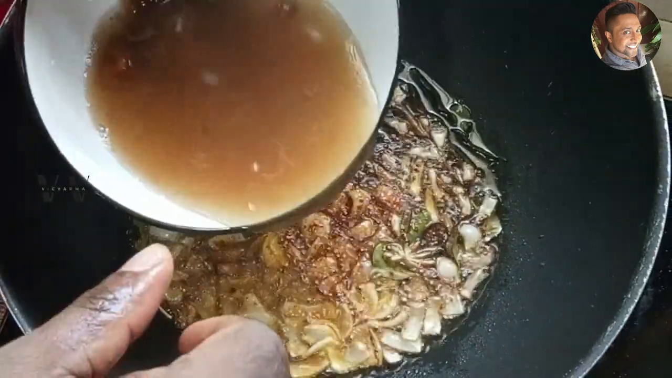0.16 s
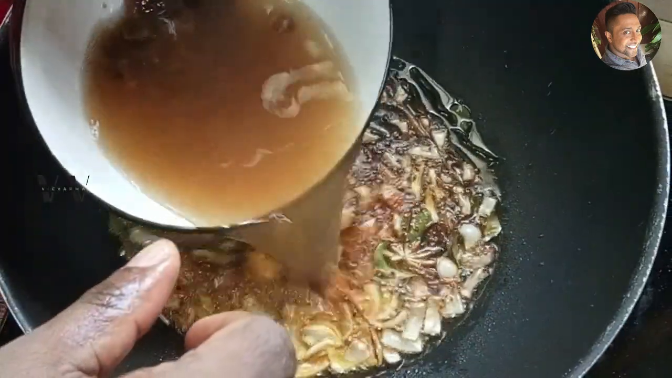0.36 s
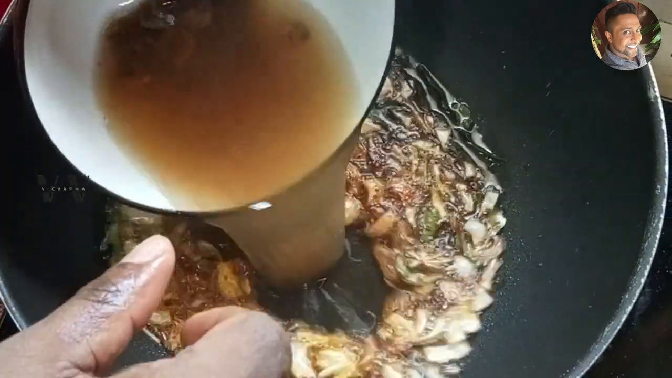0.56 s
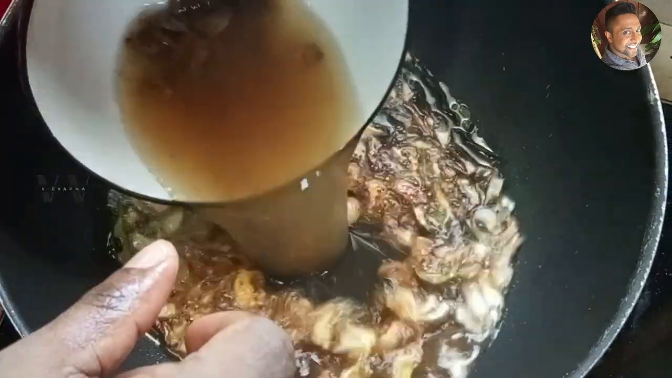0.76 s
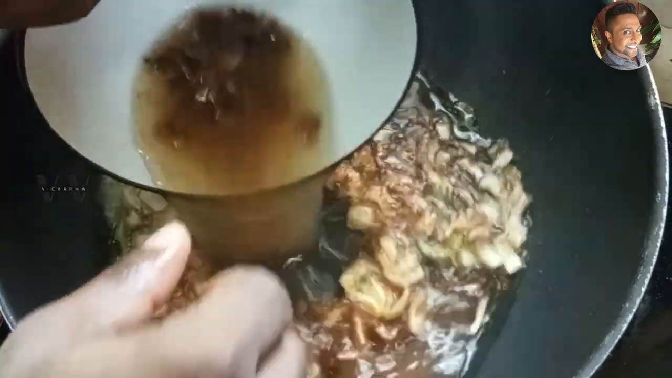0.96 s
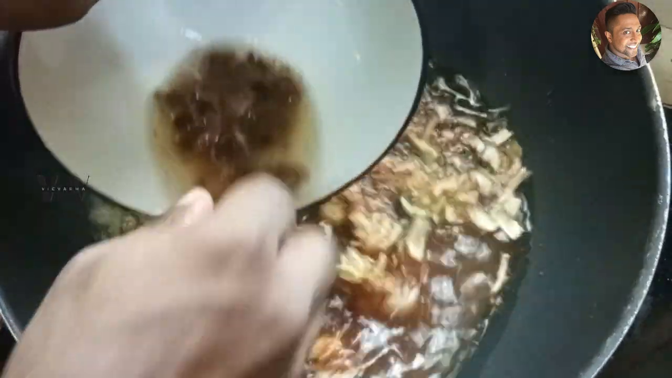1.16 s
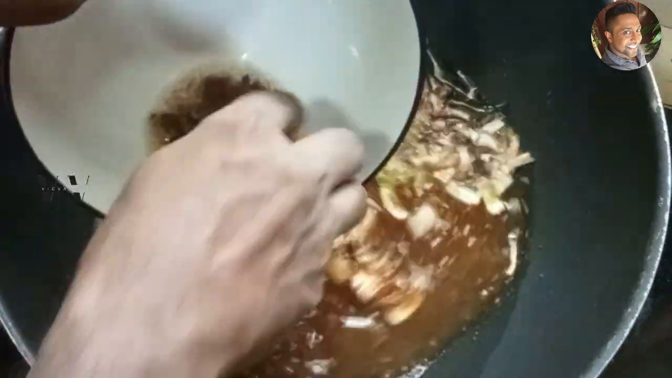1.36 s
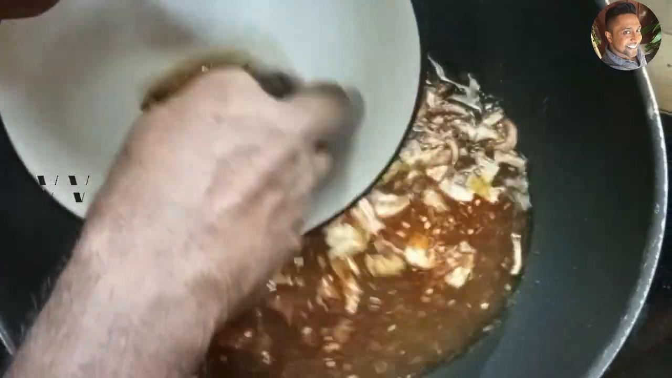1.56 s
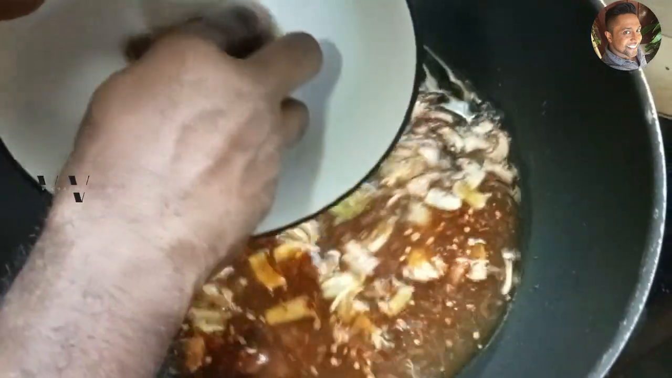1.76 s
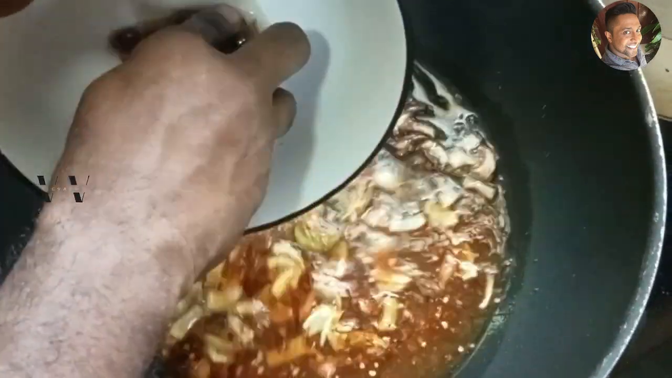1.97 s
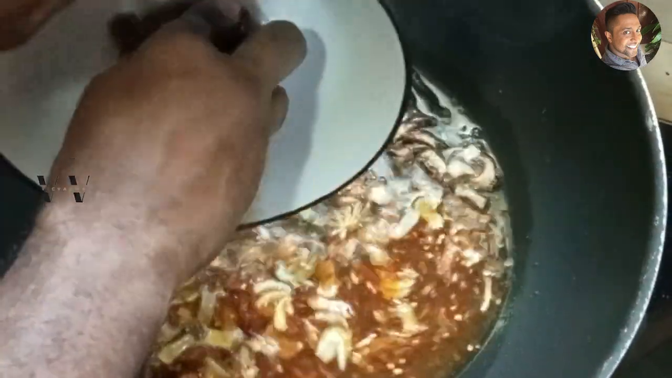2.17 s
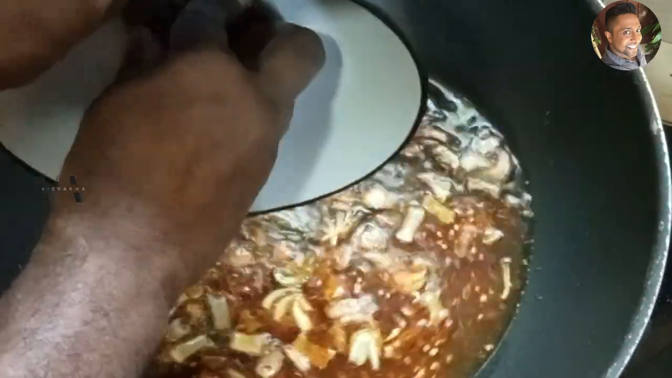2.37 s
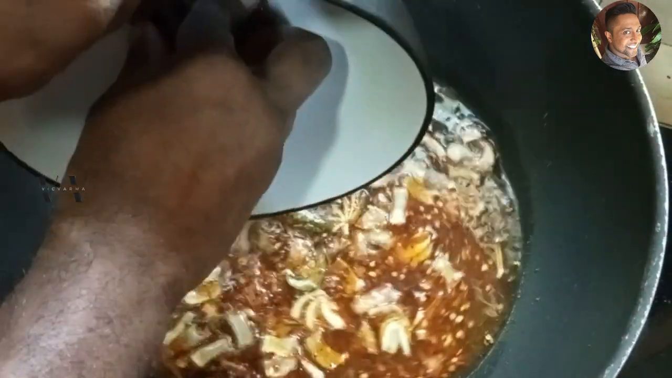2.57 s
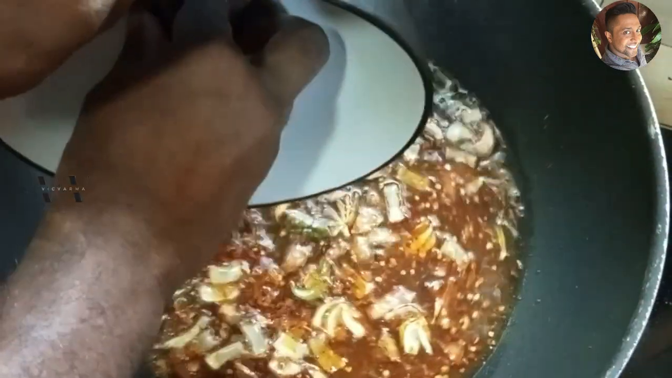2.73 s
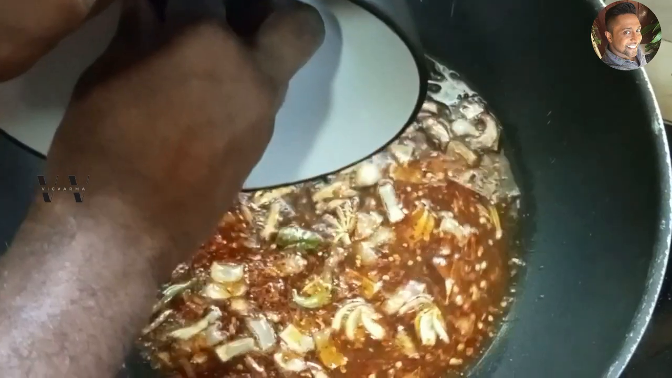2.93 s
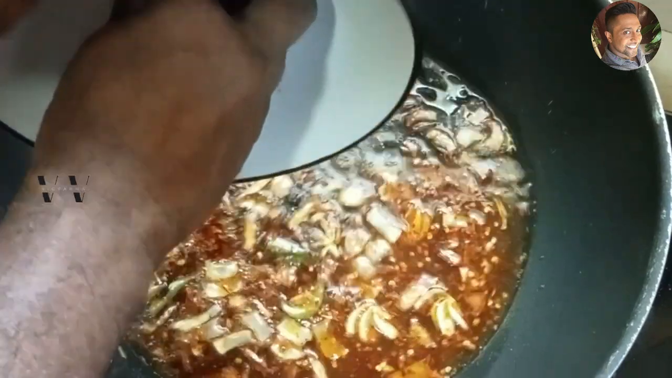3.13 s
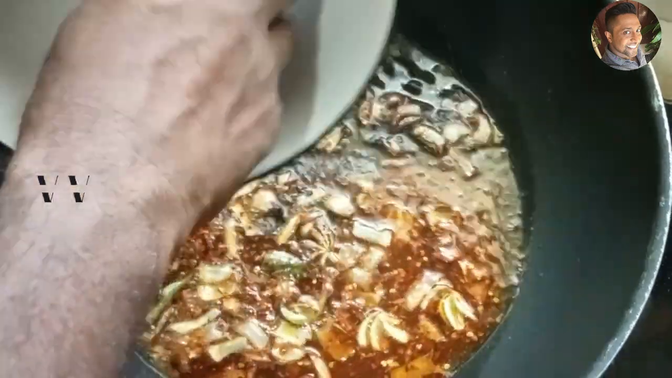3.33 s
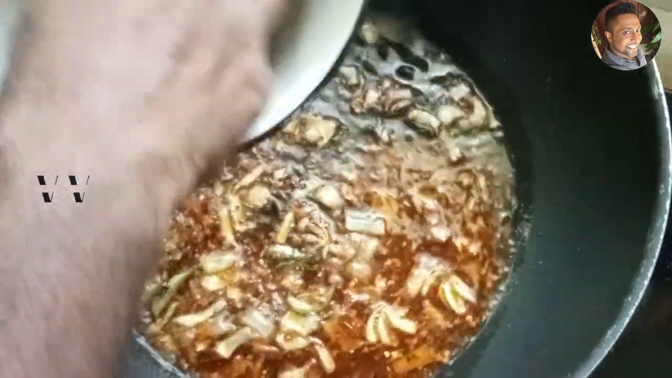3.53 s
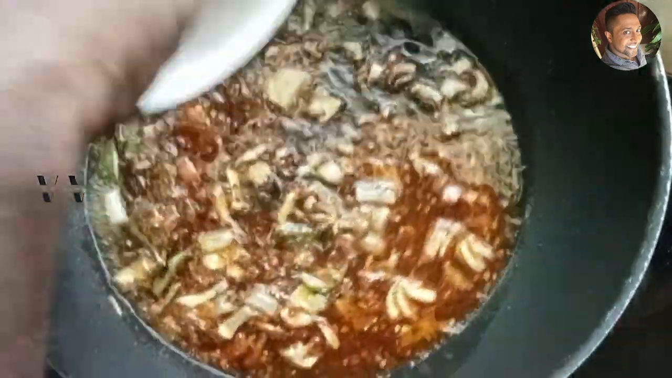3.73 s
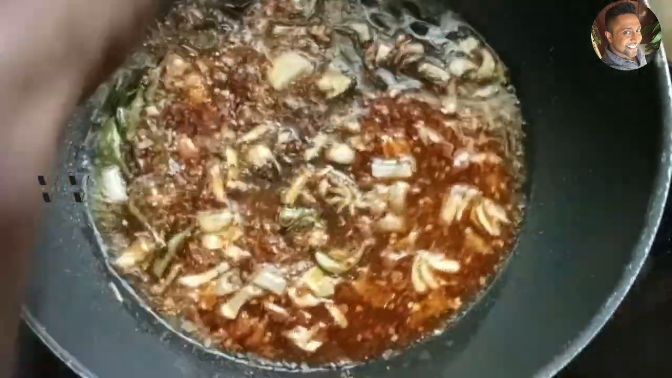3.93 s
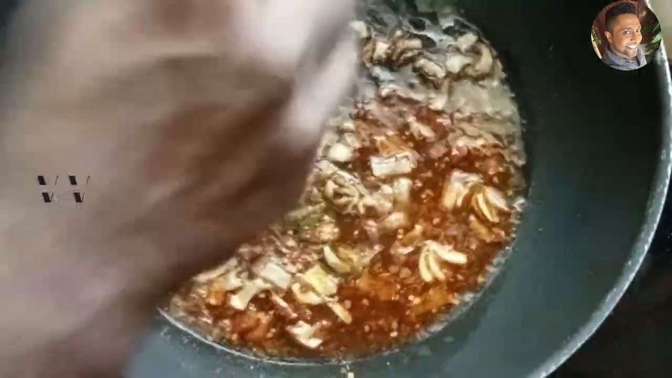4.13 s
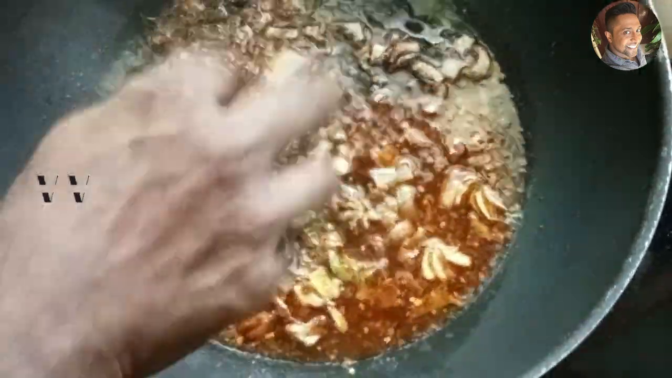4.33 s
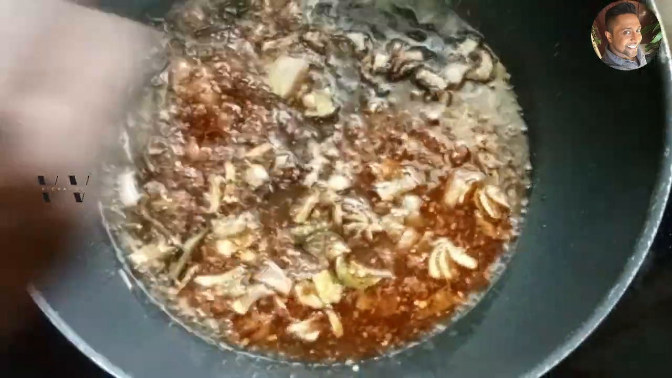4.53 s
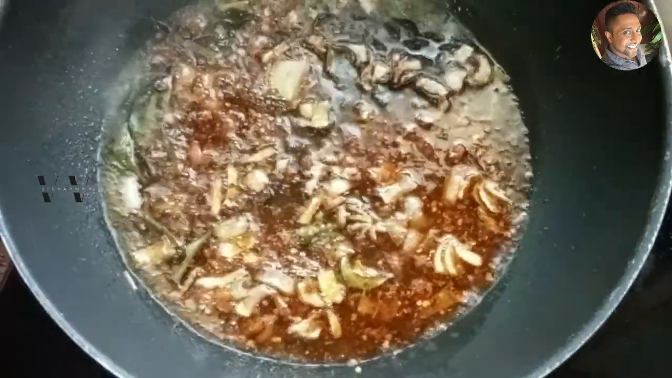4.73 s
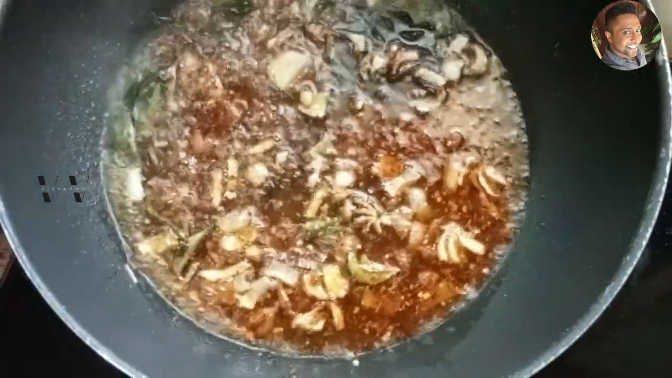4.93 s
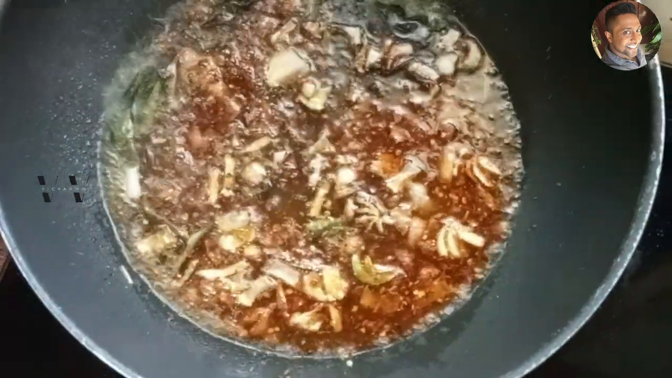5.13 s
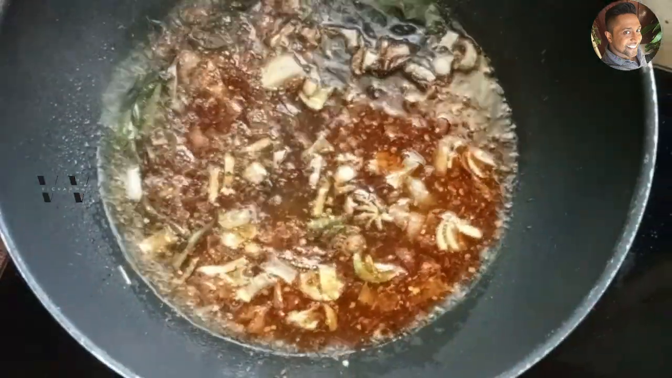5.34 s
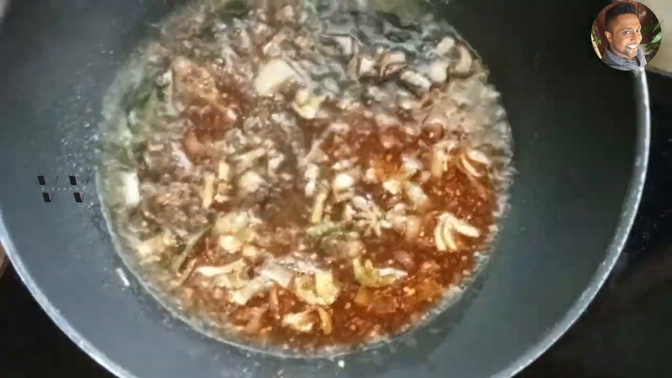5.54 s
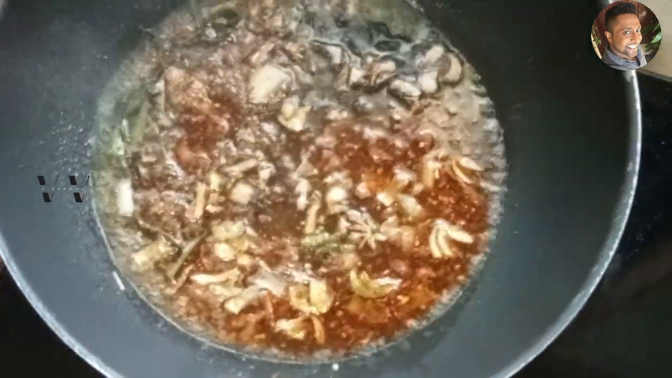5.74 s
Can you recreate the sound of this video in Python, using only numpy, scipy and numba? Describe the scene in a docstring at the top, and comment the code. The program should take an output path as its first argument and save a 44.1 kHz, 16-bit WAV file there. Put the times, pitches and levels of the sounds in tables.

```python
"""Thin sauce meets a pan of hot oil and onions, close to the microphone, over a rumbling kitchen. First the pan
spits; then the pour makes the boil flare and gurgle, and droplets under the oil crackle. The boil sinks and
builds again under a singing froth; near the end a knock sounds and a low hum starts. Bubbles are damped rings
of rising pitch; the boiling ones of every size, the crackle and the single ones ring the pan. The rumble is
filtered noise, the knock a damped ring and the hum a wavering sine."""
import sys
import numpy as np
from scipy import signal
from scipy.fft import rfft, irfft
from scipy.io import wavfile
from scipy.ndimage import uniform_filter1d
from numba import njit

SR = 44100
rng = np.random.default_rng(int(sys.argv[2]) if len(sys.argv) > 2 else 0)


def int16_out(signal):
    """Quantize to a 16-bit WAV file."""
    q = np.round(np.clip(np.atleast_2d(signal).T, -1, 1) * 32767)
    wavfile.write(sys.argv[1], SR, q.astype(np.int16))


N = 260089

# strength of the boil, which the bubble sizes and the crackle follow: (time [s], level [dB])
BOIL_CURVE = [(0, -40), (.08, -53), (.25, -49.5), (.29, -41), (.36, -35), (.43, -34), (.46, -28.5),
              (.55, -28.5), (.63, -24.5), (.72, -26.5), (.79, -22.5), (1.0, -20), (1.1, -23), (1.24, -24),
              (1.3, -27.5), (1.4, -29.5), (1.45, -26.5), (1.56, -28.5), (2.0, -31.5), (2.05, -28.5),
              (2.25, -29), (2.4, -27.5), (2.64, -32.5), (2.7, -28.5), (2.82, -30.5), (2.98, -28),
              (3.08, -29), (3.15, -28), (3.4, -31), (3.55, -30), (3.7, -26.5), (3.91, -30), (4.06, -27),
              (4.3, -25.5), (4.43, -26), (4.71, -24), (4.8, -23.5), (4.88, -23.5), (4.96, -24.5),
              (5.24, -22.5), (5.5, -22.5), (5.9, -22.5)]
# modes of the pan that ring along: (frequency [Hz], width [Hz], gain [dB])
PAN_MODES = [(408.3, 3.9, 13.5), (502.3, 13, 6), (556, 5.5, 3), (696.3, 15, 2), (858, 10.5, 0.5),
             (1005.5, 26, -1), (1120, 50, -4.5), (1327, 7.3, -1.5), (1583, 23, -7), (1819, 37, -3.5),
             (2052, 17.5, 3), (2450, 210, -11), (2652, 27, -2.5), (3300, 13, 6)]
# colour of the pan mouth and microphone: (frequency [Hz], relative gain [dB])
MOUTH_COLOUR = [(300, -25.5), (600, -14.5), (690, -4), (1010, 1), (1300, -4.5), (2620, 2.5), (3700, 3),
                (4130, -7.5), (4500, -5.5), (5270, -13.5), (7130, -16), (9400, -4), (13800, -29.5),
                (15500, -7.5)]


def undb(db):
    """Decibels to gain."""
    return 10 ** (np.asarray(db) / 20)


def level(x, db):
    """Scale to an rms level."""
    return x * undb(db) / np.sqrt(np.mean(x ** 2))


def curve(s, db):
    """Gain along (time [s], level [dB]) points."""
    return undb(np.interp(np.arange(N) / SR, s, db))


def walk(rate):
    """Random levels held 1 / rate s and slewed twice; spread near 1."""
    hold = int(SR / rate)
    steps = np.repeat(rng.standard_normal(N // hold + 1), hold)
    slewed = uniform_filter1d(uniform_filter1d(steps, hold), hold)
    return 1.3 * slewed[:N]  # restores the spread that slewing takes away


def colour(x, table):
    """Causal filter through (frequency [Hz], gain [dB]) points, from the cepstrum of the log gain."""
    hz, db = np.transpose(table)
    size = 4096
    grid = np.maximum(np.arange(size // 2 + 1) * SR / size, 1)
    log_gain = np.interp(np.log(grid), np.log(hz), db) * np.log(10) / 20
    cepstrum = irfft(log_gain)
    # folding the cepstrum forward in time gives minimum phase
    cepstrum[1:size // 2] *= 2
    cepstrum[size // 2 + 1:] = 0
    impulse = irfft(np.exp(rfft(cepstrum)))
    return signal.fftconvolve(x, impulse)[:len(x)]


def resonate(x, modes):
    """The sound plus what each mode rings along."""
    ringing = sum(undb(db) * signal.lfilter(*signal.iirpeak(hz, hz / width, SR), x)
                  for hz, width, db in modes)
    return x + ringing


@njit
def rings(n, start, turn, fade, glide, size):
    """Damped rings; a glide above 1 makes the pitch climb as a cavity closes."""
    y = np.zeros(n)
    for k in range(len(start)):
        z, w, i = size[k] + 0j, turn[k], start[k]  # rotating phasor, radians per sample, sample
        while i < n and abs(z) > abs(size[k]) * .003:
            z *= fade[k] * np.exp(1j * w)
            w = min(w * glide[k], 3.)
            y[i] += z.imag
            i += 1
    return y


def bubbles(s, size, hz, cycles, climb=0.077):
    """Bubble rings: at the starting pitch each dies by 1 / e in cycles / pi turns."""
    fade = np.exp(-np.pi * hz / (cycles * SR))
    glide = 1 + climb * hz / (cycles * SR)
    return rings(N, (s * SR).astype(np.int64), 2 * np.pi * hz / SR, fade, glide, size)


def bursts(lo_hz, hi_hz, rate, cycles, scatter_db, flicker_db, biggest_db=13, ring_spread=0.61):
    """A crowd of bubbles of one size class, bursting at random; its level flickers as the pan does."""
    u = rng.random((80000, 5)).T
    s = np.cumsum(-np.log(1 - u[0])) / rate
    s, u = s[s < N / SR], u[:, s < N / SR]
    top_hz = min(hi_hz, .45 * SR)
    hz = lo_hz * (top_hz / lo_hz) ** u[1]
    size_db = np.minimum(-scatter_db * np.log(1 - u[2]), biggest_db)
    size = undb(size_db) * np.sign(u[3] - .5)
    # most snap open, a few closed ones sing on
    ring = cycles * (1 - .98 * u[4]) ** -np.clip(ring_spread, 0, .9) / 2
    crowd = bubbles(s, size * hz / lo_hz, hz, ring)
    # a skin tears over a moment, so the burst has no hard edge outside its own range
    band_hz = [0.72 * lo_hz, min(1.13 * hi_hz, .45 * SR)]
    soft = signal.butter(2, band_hz, "band", fs=SR, output="sos")
    return signal.sosfilt(soft, crowd) * undb(flicker_db * walk(9))


def chorus(table, rate, spread, cycles):
    """Bubbles of nearly one size sing on a pitch that drifts."""
    u = rng.standard_normal((int(rate * N / SR), 3)).T
    s = np.sort(rng.random(u.shape[1])) * N / SR
    at, pitch_hz, db = np.transpose(table)
    hz = np.interp(s, at, pitch_hz) * np.exp(spread * u[0])
    crowd = bubbles(s, undb(2.8 * u[1]), hz, cycles * np.exp(0.49 * u[2]))
    return level(crowd, 0) * curve(at, db)


def sizzle():
    """All sizes follow one boil: contact holds back the largest, the pour favours middle sizes, reheating small."""
    # bubble sizes, large to small: (lowest starting pitch [Hz], highest [Hz], bursts [1/s],
    # twice the shortest ring [cycles], mean of exponential size scatter [dB], flicker [dB])
    size_classes = [(391, 611, 350, 8.3, 0.7, 1.3), (603, 813, 400, 8.3, 1.7, 0),
                    (774, 1310, 1100, 6.8, -0.6, 0.9), (1274, 1760, 1000, 6.8, 0, 1.2),
                    (1703, 2366, 2200, 12.6, 0.8, 0.64), (2302, 4056, 5000, 10.7, 1.1, 0.32)]
    # how each size follows the boil: (level over the boil [dB], change at first contact [dB],
    # change while pouring [dB], reheating from [s], slope after that [dB/s], idle frying [dB],
    # share of the burbles)
    size_shares = [(-17, -13, -7.5, 3, -2.5, -55, 0.74), (-9.5, -4, -1.5, 3.1, -5.5, -56, 0.54),
                   (-8.5, -3, 5, 2.67, -2, -55.5, 1), (-7, -1, 4.5, 4.7, -2, -54, 0.23),
                   (-0.7, -8, -2, 3.8, -1.3, -74, 0.063), (-0.73, -3.5, -1.3, 4.1, 0.5, -66, 0.089)]
    # patches of big bubbles that well up: (time [s], rise [dB], length between 1 / e points [s])
    burbles = [(1.486, 3, 0.051), (1.721, 8.5, .08), (2.446, 6.5, 0.079), (3.18, 5.5, 0.12),
               (4.245, 6, 0.63), (4.664, 4.5, 0.14), (5.76, 8.5, 0.048)]
    contact_s, contact_rise_s, contact_fade_s = 0.23, 0.052, 0.26
    pour_s, pour_rise_s, pour_end_s, pour_fall_s = 0.37, 0.3, 1.21, 0.47

    t = np.arange(N) / SR
    boil = curve(*np.transpose(BOIL_CURVE))
    contact = np.interp(t - contact_s, [0, contact_rise_s, contact_rise_s + contact_fade_s], [0, 1, 0])
    pour_points = [pour_s, pour_s + pour_rise_s, pour_end_s, pour_end_s + pour_fall_s]
    pour = np.interp(t, pour_points, [0, 1, 1, 0])
    burble_db = sum(db * np.exp(-(2 * (t - s) / length) ** 2) for s, db, length in burbles)
    out = 0
    for row, follow in zip(size_classes, size_shares):
        db, contact_db, pour_db, reheat_s, slope_db, idle_db, share = follow
        own_db = db + contact_db * contact + pour_db * pour + share * burble_db
        own_db = own_db + slope_db * np.maximum(t - reheat_s, 0)
        gain = np.hypot(boil * undb(own_db), undb(idle_db))
        crowd = resonate(colour(bursts(*row), MOUTH_COLOUR), PAN_MODES)
        out = out + level(crowd, 0) * gain
    return out * undb(0.63 * walk(16))


def hiss(row):
    """A crowd of tiny droplets through the pan mouth, at unit rms."""
    return level(colour(bursts(*row), MOUTH_COLOUR), 0)


def spray():
    """The smallest droplets hiss above the boil; a few tick out of the hiss."""
    # fine droplets, sparse ticks and finest mist, each: (first bound of starting pitch [Hz], second [Hz],
    # bursts [1/s], twice the shortest ring [cycles], mean size scatter [dB], flicker [dB])
    fine_droplets = (4090, 11400, 9000, 15.5, 0.69, 0.83)
    ticks = (4000, 13000, 260, 2.5, 3, 1.5)
    mist = (12900, 12760, 6500, 12, 0.71, 0.35)
    # (time [s], spray level [dB], mist level [dB])
    spray_levels = [(0, -47.5, -54), (.1, -51, -54), (.25, -53, -58), (.31, -41, -43), (.45, -34.5, -41),
                    (.57, -30.5, -35.5), (.72, -32, -36), (.8, -29.5, -35), (.95, -27, -34),
                    (1.31, -32, -39), (1.6, -32.5, -38.5), (2.05, -36, -41), (2.6, -36.5, -38),
                    (3.1, -34.5, -44), (3.58, -37, -43), (3.71, -33.5, -37), (3.89, -34.5, -42),
                    (4.04, -33, -40), (4.6, -34, -39), (5.3, -34, -40), (5.9, -37, -41)]

    s, spray_db, mist_db = np.transpose(spray_levels)
    fine = hiss(fine_droplets) + undb(-11) * hiss(ticks)
    both = fine * curve(s, spray_db) + hiss(mist) * curve(s, mist_db)
    return both * undb(0.92 * walk(18))


def kitchen():
    """Burner and room rumble, wavering, in the low modes of the room."""
    # (frequency [Hz], relative gain [dB])
    rumble_colour = [(18, -50), (30, -32), (54, -13), (108, -8.5), (144, -15), (240, -7.5), (355, -10),
                     (400, -5), (520, -17), (880, -120)]
    # (frequency [Hz], width [Hz], gain [dB])
    room_modes = [(63, 6.3, 10.5), (104, 21, 1), (183.5, 8.9, 7), (257, 144, -3)]
    # (time [s], level [dB])
    rumble_levels = [(0, -51.5), (1.2, -55), (1.7, -49), (2.2, -55), (2.5, -50), (4.0, -51.5), (4.4, -47.5),
                     (5.4, -48), (5.62, -59), (5.9, -47)]

    air = colour(rng.standard_normal(N), rumble_colour) * undb(1.6 * walk(14))
    return level(resonate(air, room_modes), 0) * curve(*np.transpose(rumble_levels))


def singles():
    """Lone blips with a soft start and sharp spits, ringing the pan."""
    # single large bubbles: (time [s], size before filter and pan [dB], starting pitch [Hz])
    blip_list = [(0.351, -30, 953), (0.424, -28, 1010), (.516, -24, 853), (0.536, -22, 960),
                 (.581, -22, 936), (.62, -18, 856), (0.64, -10, 971), (0.684, -19, 1000), (.714, -21, 910),
                 (0.757, -16, 997), (0.788, -15, 1023), (0.838, -13, 1016), (.86, -22, 1040),
                 (0.881, -14.5, 847), (0.933, -13, 850), (.96, -18, 990), (1.044, -15, 1020),
                 (1.076, -19, 1140), (1.127, -23, 1090), (1.191, -20, 1055), (1.243, -24, 1040),
                 (1.548, -25, 860), (2.359, -21, 1150), (3.12, -23, 1010), (3.39, -25.5, 975),
                 (4.245, -23, 1090), (5.086, -23.5, 1160), (5.125, -25, 1170), (5.204, -29, 1110),
                 (5.283, -20, 1046), (5.309, -24, 1110), (5.376, -25, 1030), (5.436, -23, 1070),
                 (5.488, -25, 1110), (5.607, -22, 1124), (5.639, -25.5, 990), (5.69, -23, 1140),
                 (5.75, -22, 1040), (5.809, -31, 1120), (5.833, -25, 1150)]
    # spits and splashes: (time [s], size before filter and pan [dB], starting pitch [Hz], ring [cycles])
    spit_list = [(0.012, -27, 2950, 3.9), (0.032, -34, 3200, 20), (0.046, -30, 3130, 16),
                 (.105, -19, 4040, 1.5), (0.274, -36, 1670, 22), (0.287, -31, 1680, 22),
                 (.338, -28, 1680, 18), (.36, -28, 1690, 18), (.416, -17, 2200, 5), (0.456, -14, 1590, 6.5),
                 (.621, -11, 2130, 11), (.657, -8, 2070, 12), (.677, -11, 2000, 8), (0.783, -7.5, 2150, 6),
                 (.879, -21, 2280, 6), (1.021, -11, 1900, 5.5), (1.2, -6, 2650, 10), (1.418, -15, 1920, 7),
                 (1.589, -11, 2430, 7), (1.754, -10, 2280, 6.4), (2.054, -12, 2270, 10),
                 (2.134, -15, 1920, 7.7), (2.222, -10.5, 2320, 7), (2.412, -16, 2080, 7),
                 (2.958, -9, 3380, 14), (2.968, -12, 2700, 4.3), (2.984, -14, 2260, 7),
                 (3.034, -22, 2530, 6), (3.12, -13, 2530, 9.3), (3.2, -17, 1940, 7),
                 (3.554, -15, 2320, 8.4), (3.614, -12.5, 1780, 8.9), (3.703, -13, 2030, 8.9),
                 (3.722, -9, 2200, 8), (4.043, -9, 2480, 6.4), (4.356, -10, 3250, 13), (4.41, -13, 2400, 7),
                 (4.516, -9, 2490, 7), (4.874, -7, 2250, 8), (5.35, -15, 2520, 7), (5.436, -9, 2400, 7),
                 (5.565, -13, 2560, 7.6), (5.757, -8, 2900, 7), (5.807, -12, 2670, 7)]

    s, db, hz = np.transpose(blip_list)
    blips = bubbles(s, undb(db), hz, cycles=np.full(len(s), 24))
    blip_band = signal.butter(3, [700, 1500], "band", fs=SR, output="sos")
    blips = signal.sosfilt(blip_band, blips)

    s, db, hz, cycles = np.transpose(spit_list)
    spits = bubbles(s, undb(db), hz, cycles)
    spit_band = signal.butter(2, [1100, 3400], "band", fs=SR, output="sos")
    spits = signal.sosfilt(spit_band, spits)
    return resonate(blips + spits, PAN_MODES)


def gurgle():
    """Bubbles of nearly one large size gurgle where the stream meets the oil."""
    # (time [s], centre of starting pitch [Hz], level [dB])
    gurgle_path = [(.32, 970, -65), (.35, 980, -40), (.4, 980, -44), (.43, 1000, -34.5), (.6, 957, -37),
                   (.8, 985, -28), (.97, 995, -34), (1.15, 1060, -34), (1.3, 1060, -33), (1.5, 1030, -60)]
    return chorus(gurgle_path, rate=130, spread=0.061, cycles=27)


def crackle():
    """Droplets trapped under oil snap unevenly, once the sauce has spread."""
    # (lowest starting pitch [Hz], highest [Hz], bursts [1/s], twice the shortest ring [cycles],
    # mean size scatter [dB], flicker [dB])
    snaps = (1200, 3600, 220, 3.2, 3.2, 1.5)
    start_s, rise_s = .4, .35
    spread = np.clip((np.arange(N) / SR - start_s) / rise_s, 0, 1)
    snapping = resonate(colour(bursts(*snaps), MOUTH_COLOUR), PAN_MODES)
    return level(snapping, -9.5) * curve(*np.transpose(BOIL_CURVE)) * spread


def froth():
    """Froth closes over the reheating sauce; its song sinks a little, then climbs as bubbles shrink."""
    # (time [s], centre of starting pitch [Hz], level [dB])
    froth_path = [(2.5, 2300, -72), (2.971, 2500, -31), (3.2, 2390, -40), (4.2, 2330, -48),
                  (4.55, 2350, -34), (4.9, 2550, -28), (5.15, 2660, -26), (5.35, 2730, -26),
                  (5.5, 2700, -26), (5.72, 2866, -22), (5.9, 2990, -23)]
    return chorus(froth_path, rate=800, spread=0.0546, cycles=30)


def thuds():
    """A soft knock of crockery on the worktop: a quickly damped ring at a steady pitch."""
    # (time [s], size before the filter [dB], frequency [Hz], 60 dB decay [s])
    knocks = [(5.037, -15.5, 307, 0.026)]
    s, db, hz, t60 = np.transpose(knocks)
    fade = 1000 ** (-1 / (t60 * SR))
    knock = rings(N, (s * SR).astype(np.int64), 2 * np.pi * hz / SR, fade, np.ones(len(s)), undb(db))
    return signal.sosfilt(signal.butter(2, [110, 420], "band", fs=SR, output="sos"), knock)


def hum():
    """A low sine, wavering in pitch and level, that sets in at the end and sags in level."""
    start_s, rise_s, start_db, fade_db_s = 5.74, .07, -46, -30
    t = np.arange(N) / SR - start_s
    sag = undb(start_db + fade_db_s * np.maximum(t - rise_s, 0))
    swell = np.clip(t / rise_s, 0, 1) ** 2 * sag * undb(4.2 * walk(29.45))
    hz = 101 + 3.2 * walk(20.5)
    return np.sqrt(2) * swell * np.sin(2 * np.pi * np.cumsum(hz) / SR)


def scene():
    """Everything at one microphone."""
    pan = sizzle() + spray() + singles() + gurgle() + crackle() + froth()
    return (pan + kitchen() + thuds() + hum())[None]


def record(dry):
    """The phone drops the deepest bass, rounds the peaks and cuts the top."""
    squeeze, top_hz = 1.1, 15530
    dry = signal.sosfilt(signal.butter(2, 50, "high", fs=SR, output="sos"), dry)
    rounded = np.tanh(squeeze * dry) / squeeze
    return signal.sosfilt(signal.ellip(14, .2, 80, top_hz, fs=SR, output="sos"), rounded)


dry = scene()
out = record(dry)
int16_out(out)
```